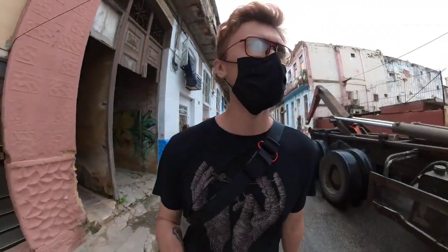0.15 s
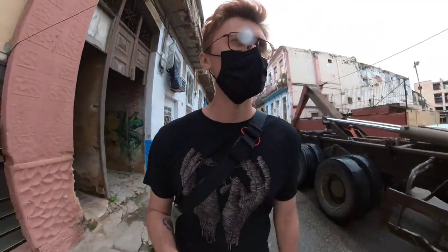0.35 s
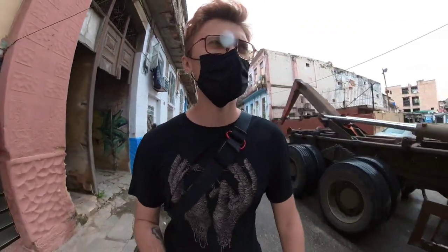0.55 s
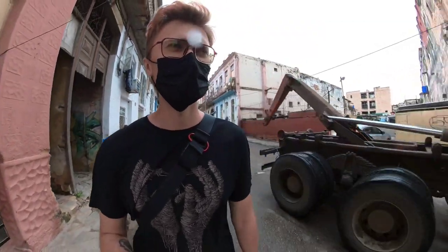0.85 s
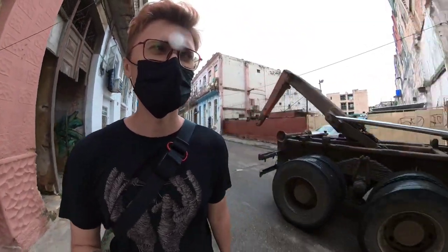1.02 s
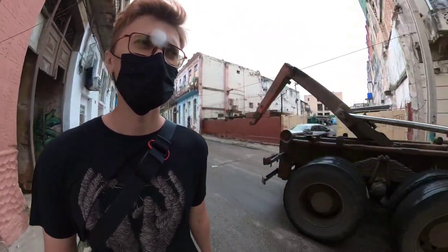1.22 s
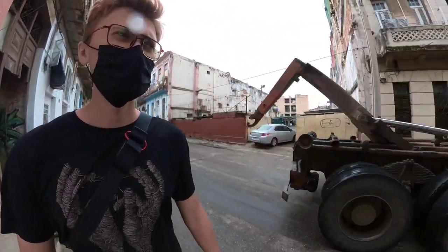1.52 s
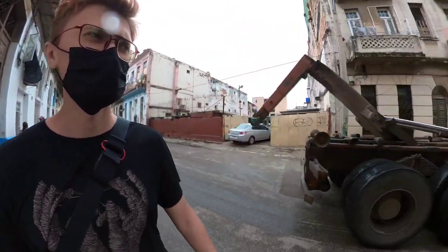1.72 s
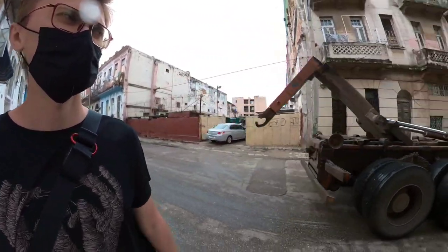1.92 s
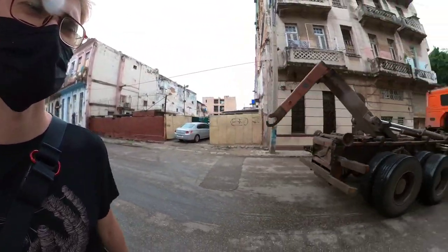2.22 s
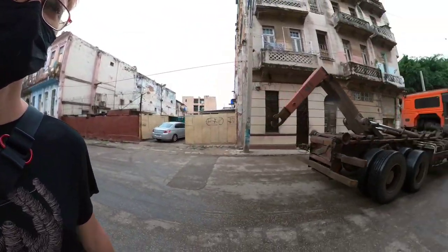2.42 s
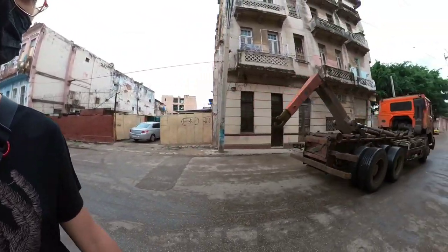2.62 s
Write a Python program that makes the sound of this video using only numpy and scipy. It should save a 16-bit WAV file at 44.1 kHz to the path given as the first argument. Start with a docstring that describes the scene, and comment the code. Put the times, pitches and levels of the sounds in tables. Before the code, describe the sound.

A heavy diesel truck rolls past a few metres away in a narrow street. Its exhaust throbs while the lifting arm and chain clank, then the engine roar swells with a thin whistle and the axles thump.

```python
"""Diesel truck passing in a narrow street.

A heavy truck rolls past a few metres away and draws off. Uneven firings throb in the exhaust until
its outlet has gone by; then the engine's roar swells over a steady clatter.
The engine body growls, side panels buzz, the street hums and the turbocharger whistles slowly down.
Tyres rumble; the lifting arm, chain, frame and loose steel knock and rattle, and the axles thump."""
import sys
import numpy as np
from scipy import signal
from scipy.fft import rfft, irfft
from scipy.io import wavfile

SR = 44100
rng = np.random.default_rng(int(sys.argv[2]) if len(sys.argv) > 2 else 0)


def store_pcm(level_fs):
    """Save levels as 16-bit WAV."""
    pcm = np.round(np.clip(level_fs, -1, 1) * 32767).astype(np.int16)
    wavfile.write(sys.argv[1], SR, np.atleast_2d(pcm).T)


N = 121275
CONTACT_TOP_HZ = 5200


def undb(db):
    """Decibels to gain."""
    return 10 ** (np.asarray(db) / 20)


def curve(rows):
    """Linear interpolation of (time_s, value) rows, per sample."""
    time_s, values = np.array(rows).T
    return np.interp(np.arange(N) / SR, time_s, values)


def unit(x):
    """Scale to rms 1."""
    return x / np.sqrt(np.mean(x ** 2))


def at_level(x, levels):
    """Scale to rms 1, then follow (time_s, level_db) rows."""
    return unit(x) * undb(curve(levels))


def noise():
    """White noise."""
    return rng.standard_normal(N)


def walk(rate_hz):
    """Smooth random drift, rms 1."""
    f = np.fft.rfftfreq(N, 1 / SR)
    return unit(irfft(rfft(noise()) * np.exp(-(f / rate_hz) ** 2), N))


def colour(x, points):
    """Filter by (freq_hz, gain_db) points."""
    hz, db = np.array(points).T
    f = np.maximum(np.fft.rfftfreq(N, 1 / SR), 1)
    gain = undb(np.interp(np.log(f), np.log(hz), db))
    return irfft(rfft(x) * gain, N)


def lowpass(x, hz):
    """Fourth-order treble cut."""
    return signal.sosfilt(signal.butter(4, hz, fs=SR, output="sos"), x)


def resonate(x, hz, width_hz):
    """One resonance, gain 1 at its centre."""
    f = np.maximum(np.fft.rfftfreq(N, 1 / SR), .1)
    return irfft(rfft(x) / (1 + 1j * (f ** 2 - hz ** 2) / (f * width_hz)), N)


def ring(x, modes):
    """Parallel resonances."""
    return sum(undb(db) * resonate(x, hz, width_hz) for hz, width_hz, db in modes)


def struck(t, modes):
    """Free decay of modes after a blow."""
    return sum(undb(db) * np.exp(-np.pi * width_hz * t) * np.sin(2 * np.pi * hz * t)
               for hz, width_hz, db in modes)


def blows(events, modes):
    """Single blows ring a heavy part, at a pitch set by where they land."""
    out, t = np.zeros(N + SR), np.arange(SR // 2) / SR
    for start_s, level_db, pitch_hz in events:
        tuned = [(pitch_hz * ratio, width_hz, db) for ratio, width_hz, db in modes]
        start = int(start_s * SR)
        out[start:start + len(t)] += undb(level_db) * struck(t, tuned)
    return out[:N]


def firings(fired, cylinders_db, scatter_db, jitter_s):
    """One pulse per whole step of the firing count, sized by its cylinder and by chance."""
    k = np.arange(np.ceil(fired[0]), fired[-1]).astype(int)
    timing, size = rng.standard_normal((len(k), 2)).T
    at = np.interp(k, fired, np.arange(N)) + jitter_s * SR * timing
    pulse_db = np.array(cylinders_db)[k % len(cylinders_db)] + scatter_db * size
    out = np.zeros(N)
    out[np.clip(at, 0, N - 1).astype(int)] = undb(pulse_db)
    return out


# four-stroke engine speed: time_s, cycles_hz
ENGINE_SPEED = [(0, 7.43), (1.2, 7.43), (1.55, 7.28), (2.0, 7.22), (2.75, 7.17)]


def firing_count(cylinders=6, first_cylinder_s=.1128):
    """Running count of firings; each cylinder fires once a cycle."""
    cycles_hz = curve(ENGINE_SPEED)
    return cylinders * (np.cumsum(cycles_hz) / SR - first_cylinder_s * cycles_hz[0])


# exhaust pulse per cylinder, in firing order: gain_db
EXHAUST_PULSES = [8.5, -9, 2.5, 4.5, -7, 5]
# pipe and muffler boom, tailpipe ring, thud: time_s, level_db
BOOM_LEVEL = [(0, -21), (.15, -20.5), (.8, -20), (1.3, -22), (1.55, -26), (1.77, -24.5), (1.85, -47),
              (2.3, -32), (2.55, -28), (2.75, -37)]
OUTLET_LEVEL = [(0, -33), (1.2, -31), (1.45, -26), (1.56, -28), (1.62, -22.5), (1.69, -19), (1.78, -22.5),
                (1.84, -36), (2.05, -32), (2.2, -42), (2.75, -36)]
THUD_LEVEL = [(0, -40), (.5, -35), (1.1, -30.5), (1.45, -41), (1.75, -38.5), (1.9, -31.5), (2.45, -44),
              (2.75, -30)]


def exhaust(fired):
    """Firings ring the pipe, the muffler and the tailpipe, over a thud at the firing rate."""
    pulses = firings(fired, EXHAUST_PULSES, scatter_db=.8, jitter_s=.0007)
    pipe = resonate(pulses, hz=94.4, width_hz=18)
    boom = resonate(pipe, hz=98.1, width_hz=20)
    tailpipe = dict(hz=110.5, width_hz=31)
    outlet = resonate(resonate(pulses, **tailpipe), **tailpipe)
    thud = lowpass(resonate(pulses, hz=42.7, width_hz=4.3), hz=68)
    return at_level(boom, BOOM_LEVEL) + at_level(outlet, OUTLET_LEVEL) + at_level(thud, THUD_LEVEL)


# push on the engine block per cylinder: gain_db
BLOCK_PULSES = [-6, -15, -12.5, -1, -1.5, -3]


def drone(fired, modes, top_hz, turbulence):
    """Firings and turbulent gas drive a group of resonances."""
    pulses = unit(firings(fired, BLOCK_PULSES, scatter_db=4.0, jitter_s=.00052))
    return lowpass(ring(pulses + turbulence * noise(), modes), top_hz)


# engine body: freq_hz, width_hz, gain_db
BODY_MODES = [(249.8, 12, 8), (266.5, 34, 6.5), (373, 5.5, -6.5), (500, 33, -6)]
# growl: time_s, level_db
GROWL_LEVEL = [(0, -45.5), (1.3, -37.5), (1.43, -26), (1.56, -28.5), (1.71, -28.5), (1.8, -33),
               (1.93, -23.5), (2.1, -39), (2.399, -45), (2.75, -34)]


def body_growl(fired):
    """The engine body resonates under the firings."""
    return at_level(drone(fired, BODY_MODES, top_hz=626, turbulence=.91), GROWL_LEVEL)


# street: freq_hz, width_hz, gain_db
STREET_MODES = [(104, 23, 6), (156, 39, -8)]
# hum: time_s, level_db
HUM_LEVEL = [(0, -31), (1.2, -28.5), (1.699, -30.5), (1.87, -28.5), (2.3, -33), (2.58, -23), (2.75, -23.5)]


def street_hum(fired):
    """The engine excites low resonances between the house fronts."""
    return at_level(drone(fired, STREET_MODES, top_hz=283, turbulence=1.0), HUM_LEVEL)


# side panels: freq_hz, width_hz, gain_db
PANEL_MODES = [(1113, 55, 0.5), (1304, 63, -4.5), (1694, 30, -11)]
# buzz: time_s, level_db
BUZZ_LEVEL = [(0, -32), (.2, -51), (.45, -44), (.75, -38.5), (.9, -41.5), (1.3, -49), (2.75, -51.5)]


def panel_buzz(fired):
    """Side panels buzz with the engine."""
    return at_level(drone(fired, PANEL_MODES, top_hz=1860, turbulence=.7), BUZZ_LEVEL)


# engine roar, mechanical clatter: freq_hz, gain_db
ROAR_SPECTRUM = [(120, -19.5), (200, 2.5), (330, 2), (460, 2.5), (680, 0), (850, -6.5), (1120, -6.5),
                 (1400, -15.5), (1700, -11.5), (2400, -24), (3100, -18.5), (3700, -23.5), (4500, -21.5),
                 (5000, -22.5), (6500, -27), (8000, -35.5), (9500, -62)]
CLATTER_SPECTRUM = [(120, -33.5), (200, -9), (255, -1), (340, -0.5), (440, -5.5), (560, -4), (980, -9),
                    (1120, -9), (1350, -13.5), (1550, -16.5), (2200, -16), (3200, -24), (4300, -25),
                    (4900, -31.5), (5300, -28.5), (6600, -29), (8000, -40), (9500, -77.5)]
# their envelopes: time_s, level_db
ROAR_ENVELOPE = [(0, -33.5), (1.2, -39.5), (1.5, -28.5), (1.8, -27.5), (2.05, -24), (2.22, -22), (2.4, -23),
                 (2.75, -27)]
CLATTER_ENVELOPE = [(0, -27), (.27, -30), (.44, -28), (.65, -30), (.97, -29), (1.06, -31), (1.35, -31),
                    (1.8, -31), (2.75, -31.5)]


def combustion(fired, pulse_depth=.092, decay_periods=.24):
    """Roar and clatter, pulsing with each firing and wavering in level."""
    pulsing = 1 + pulse_depth * np.exp(-(fired % 1) / decay_periods)
    roar = unit(colour(noise() * pulsing, ROAR_SPECTRUM))
    roar_db = curve(ROAR_ENVELOPE) + .16 * walk(rate_hz=30)
    clatter = unit(colour(noise() * pulsing, CLATTER_SPECTRUM))
    clatter_db = curve(CLATTER_ENVELOPE) + .8 * walk(rate_hz=38)
    return roar * undb(roar_db) + clatter * undb(clatter_db)


# turbocharger whistle: time_s, pitch_hz
WHISTLE_PITCH = [(0, 4965), (.5, 4835), (1.0, 4695), (1.5, 4567), (1.8, 4556), (2.2, 4530), (2.55, 4495),
                 (2.75, 4488)]
# whistle: time_s, level_db
WHISTLE_LEVEL = [(0, -50), (.6, -49.5), (1.1, -50), (1.4, -48.5), (1.5, -42), (1.75, -44), (1.95, -42),
                 (2.2, -40.7), (2.6, -40.7), (2.75, -44.5)]


def turbo(wander=.0022, flare_db=3, air_db=-49):
    """A falling whistle in rushing air; it flutters and flares as its reflections come and go."""
    pitch_hz = curve(WHISTLE_PITCH) * (1 + wander * walk(rate_hz=41.5))
    phase = 2 * np.pi * np.cumsum(pitch_hz) / SR

    def noise_band(half_width_hz):
        return walk(half_width_hz) * np.sin(phase) + walk(half_width_hz) * np.cos(phase)

    whistle = .8 * np.sin(phase) + .5 * noise_band(half_width_hz=65)
    flares = undb(flare_db * walk(rate_hz=32))
    air = undb(air_db) * noise_band(half_width_hz=230)
    return at_level(whistle * flares, WHISTLE_LEVEL) + air


# tyre rumble: freq_hz, gain_db
TYRE_SPECTRUM = [(12, -12), (28, -3), (45, 3.5), (66, 9.5), (130, 8.5), (180, 0), (230, -7.5), (400, -45)]
# rumble: time_s, level_db
TYRE_LEVEL = [(0, -29), (1.2, -38), (1.8, -38), (2.2, -24), (2.45, -26.5), (2.75, -26)]


def tyres():
    """Tyres rumble on the asphalt."""
    return at_level(colour(noise(), TYRE_SPECTRUM), TYRE_LEVEL)


# loose fittings: freq_hz, width_hz, gain_db
FITTING_MODES = [(2230, 150, -2.5), (2830, 85, -2.5), (3475, 97, -3.5), (3700, 71, 1.5), (4004, 72, -2.5)]
# jiggle: time_s, level_db
FITTING_LEVEL = [(0, -48), (.9, -49), (1.1, -56), (1.9, -49), (2.15, -41), (2.3, -41), (2.55, -47),
                 (2.75, -44)]


def fitting_jiggle(contacts_per_s=170, spread_db=4):
    """The rough road shakes loose fittings, rung by many small random contacts."""
    contacts = (rng.random(N) < contacts_per_s / SR) * undb(spread_db * noise())
    return at_level(lowpass(ring(contacts, FITTING_MODES), CONTACT_TOP_HZ), FITTING_LEVEL)


# clanks: start_s, level_db, pitch_hz
ARM_CLANKS = [(.035, -25, 1120), (.829, -23, 1340), (.965, -27, 1140), (1.168, -28, 1290),
              (2.087, -25, 1100)]
# lifting arm: pitch_ratio, width_hz, gain_db
ARM_MODES = [(1, 48, 0), (.83, 70, -6), (1.23, 70, -11), (.62, 60, -6)]


def arm_clanks():
    """Blows ring the lifting arm, bright and short."""
    return blows(ARM_CLANKS, ARM_MODES)


# shakes of chain and hook: start_s, level_db
CHAIN_SHAKES = [(.085, -43), (.365, -41), (.438, -36.5), (.735, -42), (.8, -40), (.9, -37.5), (1.655, -39),
                (2.14, -31.5), (2.195, -38), (2.235, -38), (2.285, -38), (2.335, -40), (2.385, -40),
                (2.45, -41), (2.69, -40)]
# chain link: freq_hz, width_hz, gain_db
LINK_MODES = [(1127, 40, -3), (2045, 42, -1), (3200, 40, -2), (3600, 36, 1), (3950, 40, -1), (4260, 40, -3)]


def chain_clinks(links=5, mean_gap_s=.006, loss_db=2, detune=.035, attack_s=.0015):
    """Each shake makes several steel links touch in quick succession, each at its own pitch."""
    out, t = np.zeros(N + SR), np.arange(SR // 6) / SR
    attack = 1 - np.exp(-t / attack_s)
    for start_s, level_db in CHAIN_SHAKES:
        for k in range(links):
            modes = [(hz * (1 + detune * rng.standard_normal()), width_hz, db)
                     for hz, width_hz, db in LINK_MODES]
            start = int(start_s * SR)
            out[start:start + len(t)] += undb(level_db - k * loss_db) * struck(t, modes) * attack
            start_s += 2 * mean_gap_s * rng.random()
    return out[:N]


# knocks: start_s, level_db, pitch_hz
FRAME_KNOCKS = [(.182, -20, 176), (.218, -17.5, 266), (.328, -20, 257), (.572, -20, 256), (.715, -21, 160),
                (.985, -18, 168), (1.535, -20, 172), (2.35, -18, 335)]
# frame: pitch_ratio, width_hz, gain_db
FRAME_MODES = [(0.92, 12, 1.5), (2.3, 20, -21), (0.78, 34, -19.5)]


def frame_knocks():
    """Blows ring the frame's low modes."""
    return blows(FRAME_KNOCKS, FRAME_MODES)


# rattles: start_s, level_db
STEEL_RATTLES = [(.437, -31), (.897, -31), (.962, -26.5), (2.192, -26), (2.52, -27)]
# loose steel: freq_hz, width_hz, gain_db
STEEL_MODES = [(607, 290, 22), (1155, 940, 10.5), (2050, 720, -26), (3640, 530, -10.5)]


def steel_rattles(decay_s=.018):
    """Short bursts of chattering contact ring loose steel."""
    t = np.arange(N) / SR
    force = sum(undb(level_db) * (t >= start_s) * np.exp(-np.abs(t - start_s) / decay_s)
                for start_s, level_db in STEEL_RATTLES)
    chatter = lowpass(noise(), CONTACT_TOP_HZ)
    return ring(chatter * force, STEEL_MODES) / np.std(ring(chatter, STEEL_MODES))


# road bumps: start_s, level_db, pitch_hz
AXLE_BUMPS = [(2.287, -23, 97), (2.426, -14.5, 100), (2.56, -18, 100)]
# axle: pitch_ratio, width_hz, gain_db
AXLE_MODES = [(.468, 11, -6), (1.001, 37, 5.5)]


def axle_thumps():
    """The axles thump over the uneven road and ring."""
    return blows(AXLE_BUMPS, AXLE_MODES)


# stereo side signal: freq_hz, gain_db
SIDE_SPECTRUM = [(30, -37.5), (100, -73), (2800, -51), (3100, -4), (6100, -6.5), (6600, -33.5)]


def scene():
    """The truck in the middle; a band of treble hiss gives stereo width."""
    fired = firing_count()
    chassis = arm_clanks() + frame_knocks() + steel_rattles() + axle_thumps()
    loose_parts = chain_clinks() + fitting_jiggle()
    drones = body_growl(fired) + street_hum(fired) + panel_buzz(fired)
    engine = exhaust(fired) + combustion(fired) + turbo()
    mid = engine + drones + chassis + loose_parts + tyres()
    side = colour(combustion(fired) + tyres(), SIDE_SPECTRUM)
    return np.array([mid + side, mid - side])


def record(dry):
    """Steep cut of the top treble."""
    top_hz = 8100
    return signal.sosfilt(signal.ellip(8, .2, 80, top_hz, fs=SR, output="sos"), dry)


dry = scene()
out = record(dry)
store_pcm(out)
```